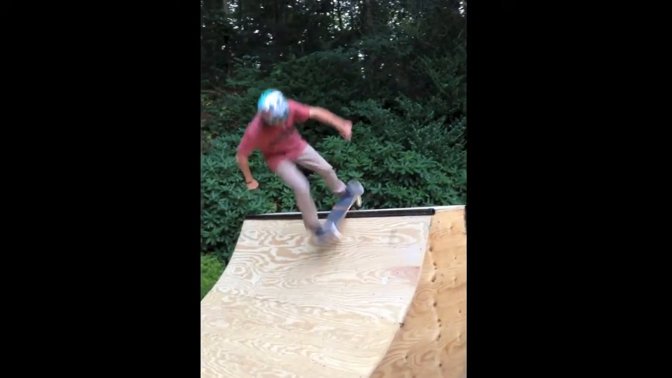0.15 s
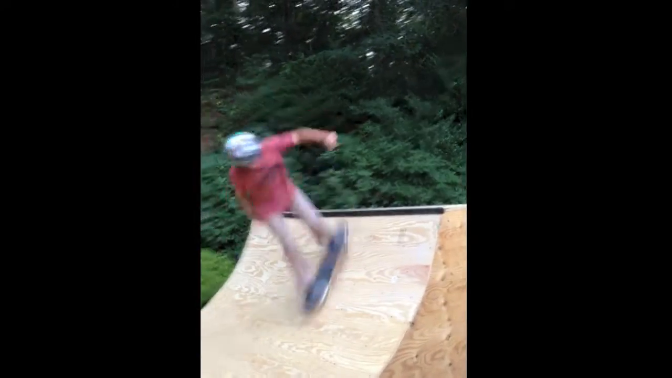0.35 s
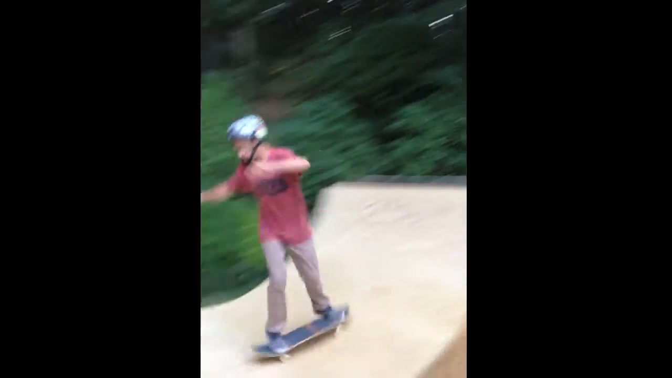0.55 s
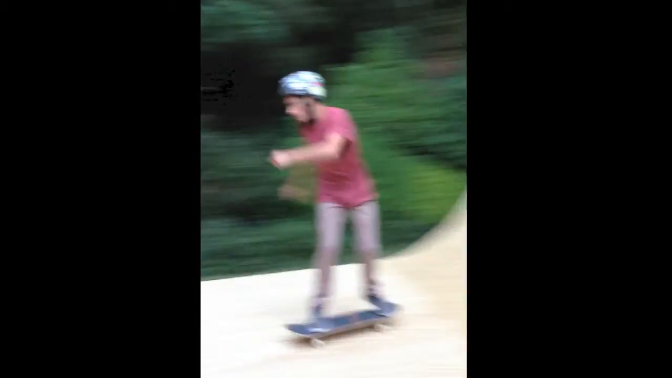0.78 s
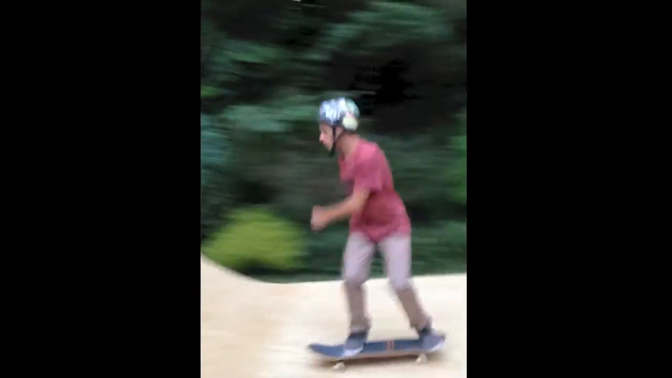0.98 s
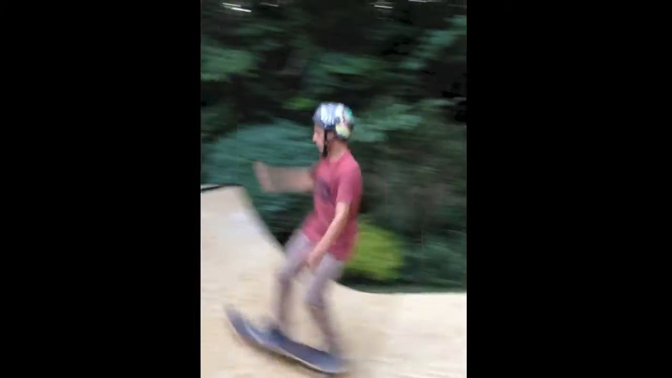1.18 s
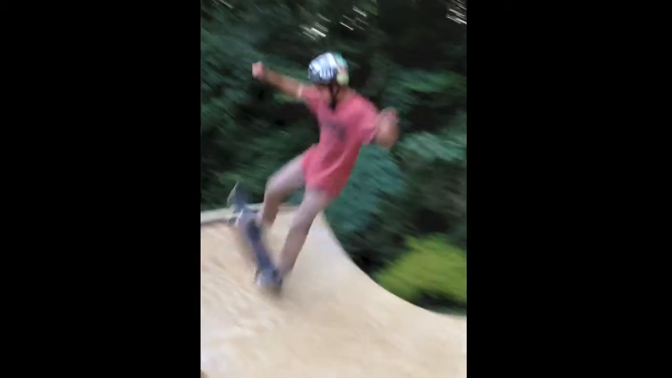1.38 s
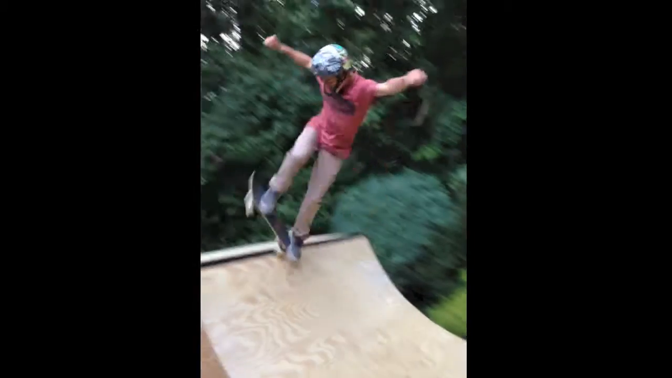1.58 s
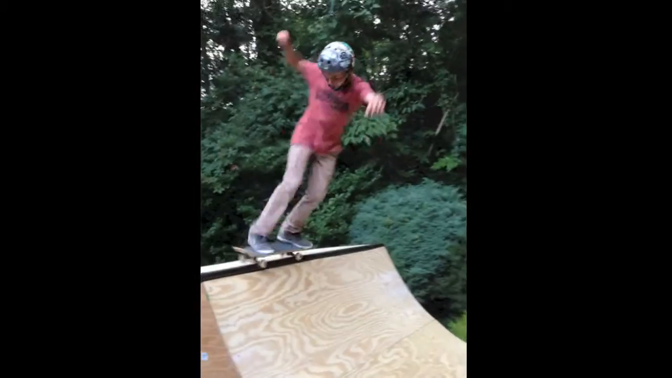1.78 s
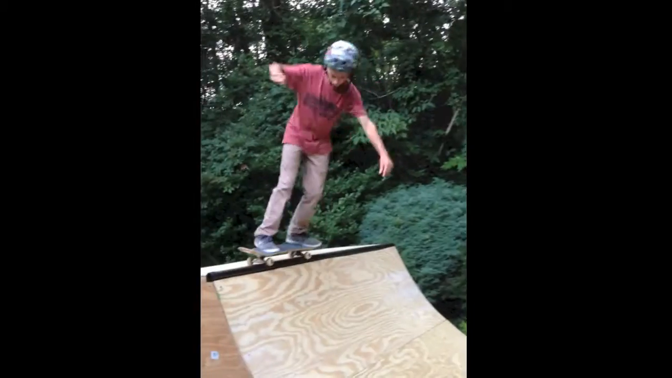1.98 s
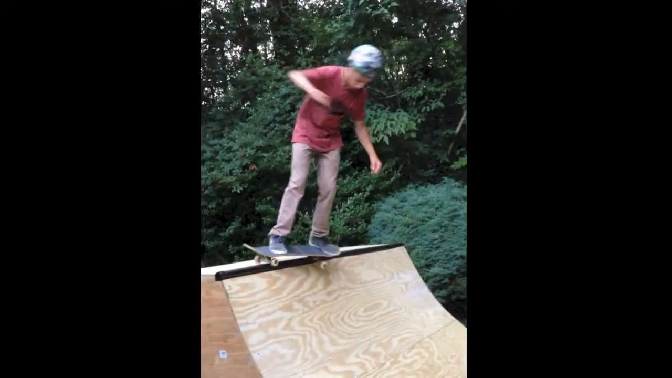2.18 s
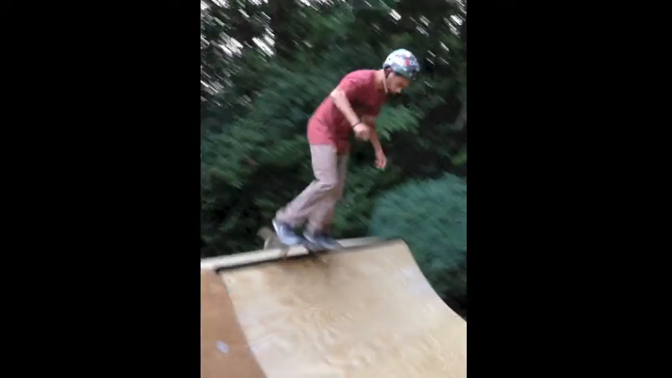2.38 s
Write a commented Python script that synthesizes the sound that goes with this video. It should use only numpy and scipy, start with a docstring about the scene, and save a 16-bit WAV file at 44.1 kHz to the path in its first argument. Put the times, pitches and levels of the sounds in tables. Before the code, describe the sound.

Skateboard rolling across a hollow wooden ramp, with sharp knocks and a metal clang.

```python
"""A plywood ramp in a quiet yard. A skateboard drops in, rolls across and climbs to the steel edge pipe.
Rough wheels shake the hollow ramp: it booms and its panels hum. Grit rattles and rasps in the board
over a thin bearing hiss. Seams and landings crack through the board and thump the panels.
The axles strike the pipe and ring."""
import sys
import numpy as np
from scipy import signal
from scipy.fft import rfft, irfft
from scipy.io import wavfile
from scipy.ndimage import uniform_filter1d

SR = 44100
rng = np.random.default_rng(int(sys.argv[2]) if len(sys.argv) > 2 else 0)


def to_wav(s):
    """Save 16-bit WAV."""
    ch = np.atleast_2d(s).T  # columns
    pcm = np.round(np.clip(ch, -1, 1) * 32767)  # PCM
    wavfile.write(sys.argv[1], SR, pcm.astype(np.int16))


N = 110250

# Noise spectra. Each row: frequency in Hz, relative density in dB.
YARD_SPECTRUM = [(15, -21.5), (25, 10.5), (104, 8), (368, -38), (2120, -29), (2770, -43.5), (4500, -43),
                 (5430, -13), (6050, -35), (15500, -45)]
BEARING_SPECTRUM = [(6000, -1), (7000, -2), (11000, -3), (15500, -13.5)]
RATTLE_SPECTRUM = [(300, -24), (500, 7.5), (750, 0.5), (1000, -1.5), (1300, -5), (2000, -17), (2600, -22),
                   (3400, -56)]
RASP_SPECTRUM = [(1410, 8), (2400, 0.5), (2760, -1.5), (3190, -3), (5100, 0), (7500, -15.5), (9750, -23),
                 (16500, -120)]
# Bearing hiss. Each row: time in seconds, level in dB.
BEARING_LEVELS = [(0, -83), (.42, -65), (.7, -60.5), (1.13, -62.5), (1.3, -57), (1.55, -61.5), (1.8, -64.5),
                  (1.9, -48.5), (2.05, -71), (2.18, -62), (2.3, -74.5)]
# Wheel contact. Each row: time in seconds, then boom, hollow rumble, rattle and rasp levels in dB.
ROLL_LEVELS = [(0, -61, -60, -59.5, -59.5), (.14, -42.5, -56.5, -90, -66.5), (0.228, -56, -93, -55.5, -71),
               (.3, -36, -41, -41.5, -47.5), (0.393, -35, -36, -48.5, -59.5), (.42, -22, -26, -36.5, -42),
               (.57, -40, -23, -31.5, -38.5), (.63, -51, -26, -29, -37), (0.688, -23.5, -25.5, -31, -42),
               (0.798, -34, -34, -52, -55), (.86, -53, -39, -48.5, -52), (.92, -29.5, -41, -43.5, -56.5),
               (1.1, -45, -27.5, -41, -54.5), (1.135, -58, -62, -37.5, -52), (1.148, -34, -24, -28, -37),
               (1.2, -42, -15, -30.5, -40.5), (1.248, -19.5, -20, -23.5, -33.5),
               (1.441, -19.5, -18.5, -29.5, -40), (1.497, -39, -36, -30, -58),
               (1.528, -34.5, -31, -38, -50.5), (1.68, -27, -42.5, -56, -55.5),
               (1.799, -38, -55, -53.5, -53), (1.88, -37.5, -62, -46.5, -36), (1.968, -29, -73, -58, -54.5),
               (2.051, -57, -72, -70, -61), (2.12, -45, -49, -52, -52.5), (2.177, -24, -49, -43.5, -49),
               (2.3, -48, -72, -67.5, -60.5), (2.5, -73, -63.5, -68, -74)]
# Panel hum under the wheels. Each row: time in seconds, pitch in Hz, level in dB.
LOW_HUM = [(.6, 208, -80), (.68, 185, -19), (.75, 159, -27), (.81, 108, -30), (0.851, 114, -63),
           (.92, 122, -33.5), (1.0, 127, -26.5), (1.07, 130, -34), (1.12, 140, -58), (1.14, 140, -80)]
HIGH_HUM = [(.82, 246, -87), (.9, 242, -34.5), (.96, 348, -36.5), (1.04, 360, -33.5), (1.12, 338, -40),
            (1.201, 398, -21.5), (1.298, 492, -28), (1.51, 404, -28.5), (1.58, 380, -42), (1.66, 387, -98)]
# Modes of the hollow ramp and of the axles on the pipe. Each row: frequency in Hz, level in dB,
# T60 in seconds.
RAMP_MODES = [(73, -5, 0.13), (93, -5, 0.21), (119.2, -5, 0.13), (136.5, 2, 0.086), (198.8, 2.5, 0.16),
              (237.2, 9, 0.052), (289.2, 0.5, 0.084), (350.6, 0, 0.15), (399.4, -2, 0.15), (480, -4, 0.059),
              (582, -34, 0.21)]
REAR_AXLE_MODES = [(2200, 4, .05), (4747, 0, .14), (4899, -5, .19), (5057, -8, .15), (5376, -7, .15),
                   (5648, 0, .17), (5924, -5, .14)]
FRONT_AXLE_MODES = [(1600, 4, .09), (2010, 3, .05), (3340, -16, .4), (3740, -13, .25), (4608, -7, .3),
                    (4673, -11, .45), (4788, -6, .5), (4848, -8, .4), (5120, -13, .3), (5480, -15, .4),
                    (5650, -7, .3), (6290, 4, .16), (7122, -11, .25), (8510, -10, .2), (12900, -15, .22)]
# Board resonances. Each row: frequency in Hz, width in Hz, gain in dB.
RATTLE_BANDS = [(744, 22, -29.5), (1597, 110, -22), (1878, 28, -25.5), (3195, 360, -21.5)]
BOARD_BANDS = [(549, 470, -12.5), (834, 550, -13.5), (1560, 330, 11.5), (2055, 510, 6), (3500, 1080, 5),
               (4856, 500, 2), (5670, 1300, -1)]
# Axle blows on the pipe. Each row: start in seconds, level in dB.
REAR_BLOWS = [(1.7, -34.5)]
FRONT_BLOWS = [(1.83, -29), (1.922, -46)]
# Soft blows on the panels. Each row: start in seconds, level in dB, pitch in Hz, T60 in seconds.
THUMP_HITS = [(0.076, -44, 137, 0.021), (0.244, -1, 552, 0.03), (.2468, -5, 582, 0.022),
              (.262, -5, 72, 0.036), (0.405, -2, 179.4, 0.075), (0.41, -9.5, 555, 0.042),
              (0.443, -8.5, 131, 0.044), (.529, -17.5, 269, 0.18), (0.595, -1.5, 226, 0.041),
              (.652, -3.5, 280, 0.051), (0.661, -4, 206.6, 0.081), (1.143, -4.5, 144, 0.093),
              (1.164, -11.5, 196, 0.074), (1.186, -11, 564, 0.063), (1.213, -1, 163, 0.026),
              (1.275, -8.5, 517, 0.037), (1.401, -0.5, 175, 0.066), (1.475, -12, 131, 0.18),
              (1.612, -15.5, 367, 0.028), (1.698, -15.5, 101, 0.099), (1.834, -8, 108.4, 0.091),
              (1.92, -28.5, 229, 0.094), (2.152, -19, 176, 0.035), (2.164, -23, 238.5, 0.1),
              (2.193, -26.5, 107, 0.1)]
# Sharp hits on the board. Each row: start in seconds, level in dB, low and bright shares in dB,
# burst length in seconds, relative tail level in dB.
CRACK_HITS = [(0.0729, -43, 2.5, -7.5, 0.0014, -1), (0.111, -55.5, 13, -10, 0.0026, -5),
              (0.2436, -15.5, -25, -23, 0.00034, -42), (0.246, -17.5, 2.5, -16.5, 0.002, -7),
              (0.402, -28, 5.5, -16, 0.00054, 3), (0.407, -15.5, 1, -19.5, 0.0024, -18),
              (0.4458, -25.5, 5, -15, 0.00033, -6.5), (0.527, -23, 1, -13.5, 0.00065, -16),
              (0.59, -26, -1, -15, 0.0031, -11), (0.649, -23.5, -28, 2, 0.0013, -19),
              (0.7275, -24.5, -6.5, -8, 0.0014, -16), (0.925, -47, -1.5, -10.5, 0.01, -2),
              (1.141, -35.5, 6, -14.5, 0.0062, -22), (1.2148, -24.5, 3, -23, 0.0025, -6),
              (1.4716, -23.5, -0.5, -12.5, 0.0046, -4.5), (1.6114, -29.5, 2.5, -8, 0.0017, -3.5),
              (1.641, -36.5, 6, -5, 0.00071, -6.5), (1.6994, -29, 0.5, -12, 0.0045, -2),
              (1.8304, -14, -7.5, -8, 0.005, -9.5), (1.918, -35, -0.5, -48, 0.0054, -5.5),
              (2.113, -46.5, -18, -11.5, 0.0019, -3.5), (2.148, -31, -10, -26.5, 0.0027, 1.5),
              (2.1609, -23, -7, -12, 0.00089, -3), (2.195, -37, -10, -14, 0.0034, -1),
              (2.202, -40, -5, -17, 0.0032, -6.5), (2.408, -57.5, 3, -9, 0.0061, -1)]

YARD_DB = -56.5
BUMPS_PER_S, GRIT_PER_S, BUMP_SPREAD_DB, GRIT_SPREAD_DB = 600, 9500, 1.5, 4.5
SURGE_DB, SURGE_HZ, SURGE_WIDTH_HZ = 3.5, 34, 21
PANEL_WIDTH_HZ = 43.6
SMOOTH_DB, ROUGH_DB = -42, -28
WAVER_DEPTH = 0.9
THUMP_RISE_S, THUMP_RAMP_DB = 0.0031, -2.5
CRACK_RISE_S, CRACK_FALL_S, TAIL_RISE_S, TAIL_T60_S = 0.00016, 0.0016, 0.013, 0.11
SNAP_HZ, SNAP_WIDTH_HZ, SNAP_SHARPNESS = 9370, 5500, 13
LOW_CUT_HZ, HIGH_CUT_HZ = 92, 15300


def gain_of(db):
    """dB to gain."""
    return 10 ** (np.asarray(db) / 20)


def unit_rms(x):
    """Scales to RMS 1."""
    return x / np.sqrt(np.mean(x ** 2) + 1e-20)


def add(mix, start_s, sound):
    """Mixes a sound in at start_s."""
    part = mix[round(start_s * SR):][:len(sound)]
    part += sound[:len(part)]


def curves(table):
    """Interpolates timed rows to one curve per value column."""
    times_s, *columns = np.transpose(table)
    return [np.interp(np.arange(N) / SR, times_s, column) for column in columns]


def coloured(x, spectrum):
    """Shapes x by a spectrum, -80 dB outside it; RMS 1."""
    points_hz, points_db = np.transpose(spectrum)
    hz = np.fft.rfftfreq(len(x), 1 / SR)
    shape_db = np.interp(np.log(hz + 1), np.log(points_hz + 1), points_db, left=-80, right=-80)
    return unit_rms(irfft(rfft(x) * gain_of(shape_db), len(x)))


def resonate(x, hz, width_hz):
    """Two-pole resonance, peak gain 1."""
    return signal.lfilter(*signal.iirpeak(hz, hz / width_hz, fs=SR), x)


def modal_ring(modes, length_s):
    """Decaying sines after one tap."""
    t = np.arange(round(length_s * SR)) / SR
    return sum(gain_of(db - 60 * t / t60_s) * np.sin(2 * np.pi * hz * t) for hz, db, t60_s in modes)


def grains(per_s, spread_db):
    """Random clicks, a few large; RMS 1."""
    size = gain_of(spread_db * np.minimum(rng.exponential(1, N), 4))
    sign = rng.choice([-1., 1.], N)
    return unit_rms(size * sign * (rng.random(N) < per_s / SR))


def yard():
    """Steady soft hush."""
    return gain_of(YARD_DB) * coloured(rng.standard_normal(N), YARD_SPECTRUM)


def bearing_hiss(grit):
    """The bearings give a thin, slightly grainy hiss."""
    level_db, = curves(BEARING_LEVELS)
    return gain_of(level_db) * coloured(rng.standard_normal(N) + 0.15 * grit, BEARING_SPECTRUM)


def panel_hum(bumps, track):
    """Bumps drive a gliding resonance of the panel under the wheels."""
    hz, db = curves(track)
    pole = np.exp(-np.pi * PANEL_WIDTH_HZ / SR)
    carrier = np.exp(2j * np.pi * np.cumsum(hz) / SR)
    baseband = signal.lfilter([1], [1, -2 * pole, pole * pole], bumps / carrier)
    return gain_of(db) * unit_rms((carrier * baseband).real)


def ramp_rumble(drive, modes):
    """Wheel bumps ring the hollow ramp."""
    ring = modal_ring(modes, length_s=0.4)
    return signal.oaconvolve(drive, ring / np.linalg.norm(ring))[:N]


def board_rattle(bumps, grit, surge, level_db):
    """Grit and bumps shake the board: smooth under light rolling, grainy under load."""
    load = np.interp(level_db, [SMOOTH_DB, ROUGH_DB], [0, 1])
    rough = load * unit_rms(grit + 0.71 * bumps) * surge
    shake = rough + np.sqrt(1 - load ** 2) * rng.standard_normal(N)
    ring = sum(gain_of(db) * unit_rms(resonate(shake, hz, width_hz)) for hz, width_hz, db in RATTLE_BANDS)
    return gain_of(level_db) * (coloured(shake, RATTLE_SPECTRUM) + ring)


def wheels():
    """Rolling: plywood bumps shake the ramp; finer grit rattles and rasps in the board."""
    boom_db, hollow_db, rattle_db, rasp_db = curves(ROLL_LEVELS)
    bumps, grit = grains(BUMPS_PER_S, BUMP_SPREAD_DB), grains(GRIT_PER_S, GRIT_SPREAD_DB)
    flutter = unit_rms(resonate(rng.standard_normal(N), SURGE_HZ, SURGE_WIDTH_HZ))
    surge = unit_rms(gain_of(SURGE_DB * flutter))
    drive = bumps * np.sqrt(surge)
    hiss = bearing_hiss(grit)
    hum = panel_hum(bumps, LOW_HUM) + panel_hum(bumps, HIGH_HUM)
    boom = ramp_rumble(gain_of(boom_db) * drive, RAMP_MODES[:4])
    hollow = ramp_rumble(gain_of(hollow_db) * drive, RAMP_MODES[4:])
    rattle = board_rattle(bumps, grit, surge, rattle_db)
    rasp = gain_of(rasp_db) * coloured(grit + rng.standard_normal(N), RASP_SPECTRUM)
    return hiss + hum + boom + hollow + rattle + rasp


def axle_clangs():
    """Steel rings on steel; each partial wavers as the axle rests on the pipe."""
    out = np.zeros(N)
    for modes, blows in ((REAR_AXLE_MODES, REAR_BLOWS), (FRONT_AXLE_MODES, FRONT_BLOWS)):
        for start_s, db in blows:
            for mode in modes:
                ring = modal_ring([mode], length_s=0.7)
                waver = unit_rms(uniform_filter1d(rng.standard_normal(len(ring)), size=150))
                add(out, start_s, gain_of(db) * ring * (1 + WAVER_DEPTH * waver))
    return out


def ramp_thumps():
    """A soft blow swings the nearest panel and rings the whole ramp."""
    out = np.zeros(N)
    ramp = modal_ring(RAMP_MODES, length_s=0.4)
    ramp *= gain_of(THUMP_RAMP_DB) / abs(ramp).max()
    rise = np.minimum(np.arange(len(ramp)) / SR / THUMP_RISE_S, 1)
    for start_s, db, hz, t60_s in THUMP_HITS:
        panel = modal_ring([(hz, 0, t60_s)], length_s=0.4)
        add(out, start_s, gain_of(db) * rise * (panel + ramp))
    return out


def board_ring(chatter, bands):
    """Chatter through board resonances of alternating polarity."""
    return sum((-1) ** k * gain_of(db) * resonate(resonate(chatter, hz, 2 * width_hz), hz, width_hz)
               for k, (hz, width_hz, db) in enumerate(bands))


def board_cracks():
    """Seams and landings send a burst of chatter through the board, with a bright snap and a tail."""
    out, t = np.zeros(N), np.arange(round(0.3 * SR)) / SR
    for start_s, db, low_db, bright_db, length_s, tail_db in CRACK_HITS:
        chatter, snap_noise = rng.standard_normal((2, len(t)))
        burst = np.minimum(t / CRACK_RISE_S, 1) * np.exp(-np.maximum(t - length_s, 0) / CRACK_FALL_S)
        tail = np.minimum(t / TAIL_RISE_S, 1) * gain_of(tail_db - 60 * t / TAIL_T60_S)
        low, mid = (board_ring((burst + tail) * chatter, bands) / np.std(board_ring(chatter, bands))
                    for bands in (BOARD_BANDS[:2], BOARD_BANDS[2:]))
        treble = resonate(resonate(snap_noise, SNAP_HZ, SNAP_WIDTH_HZ), SNAP_HZ, SNAP_WIDTH_HZ)
        snap = (burst ** SNAP_SHARPNESS + tail) * unit_rms(treble)
        add(out, start_s, gain_of(db) * (mid + gain_of(low_db) * low + gain_of(bright_db) * snap))
    return out


def scene():
    """Yard, rolling and impacts in mono."""
    return (yard() + wheels() + board_cracks() + ramp_thumps() + axle_clangs())[None]


def record(dry):
    """Small microphone: bass cut, rounded peaks, band limit."""
    low_cut = signal.butter(2, LOW_CUT_HZ, "high", fs=SR, output="sos")
    rounded = np.tanh(signal.sosfilt(low_cut, dry))
    high_cut = signal.firwin(511, HIGH_CUT_HZ, window=("kaiser", 9), fs=SR)
    return signal.oaconvolve(rounded, high_cut[None], "same")


dry = scene()
out = record(dry)
to_wav(out)
```